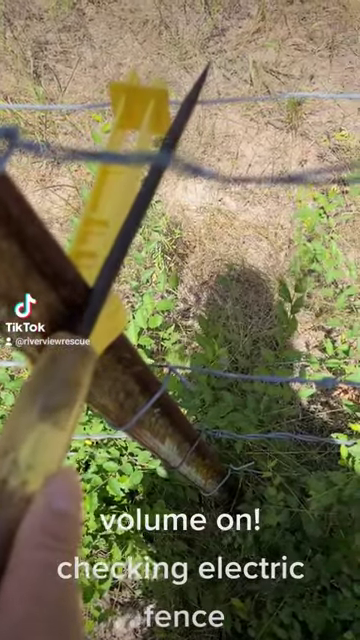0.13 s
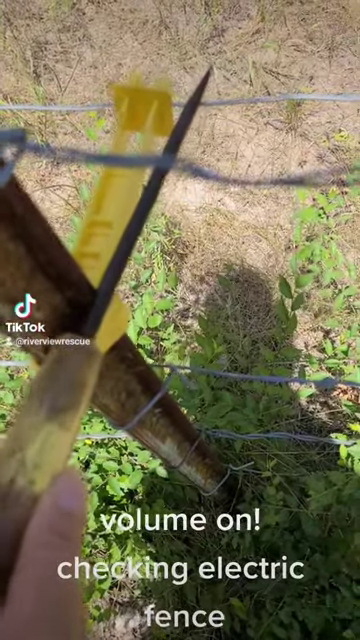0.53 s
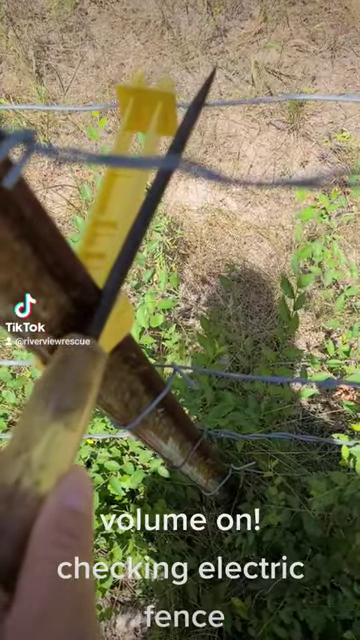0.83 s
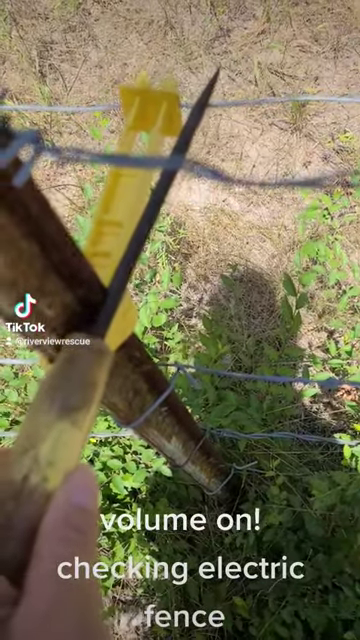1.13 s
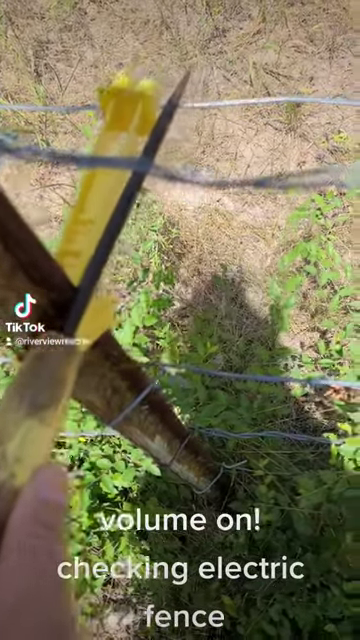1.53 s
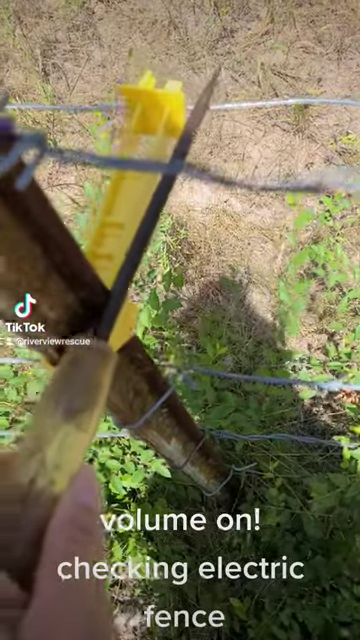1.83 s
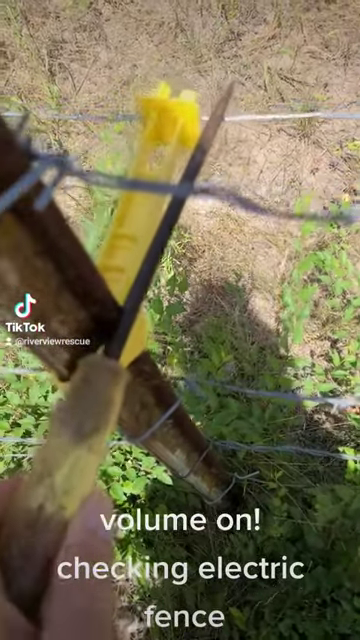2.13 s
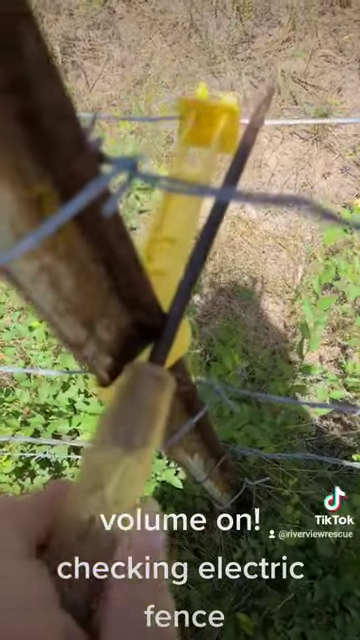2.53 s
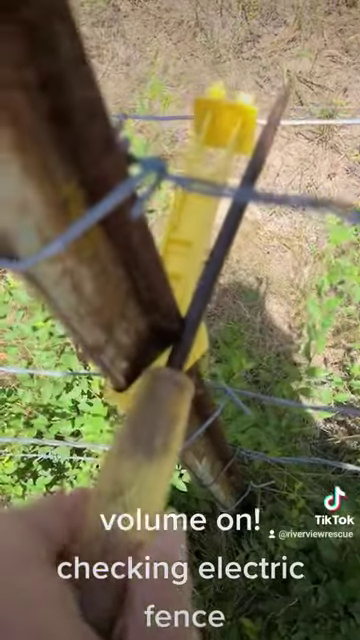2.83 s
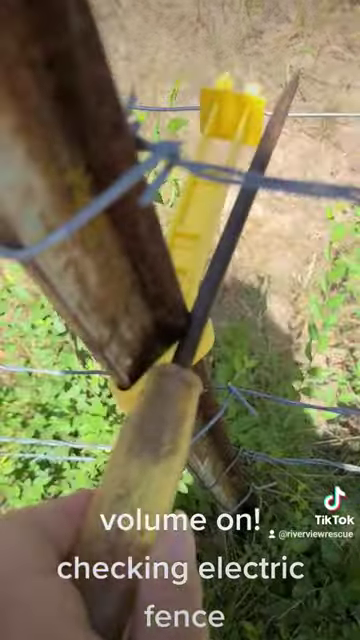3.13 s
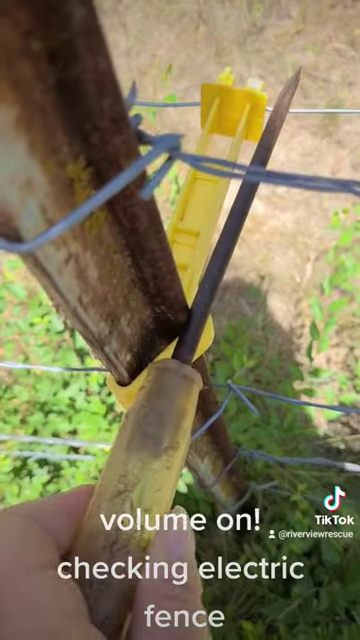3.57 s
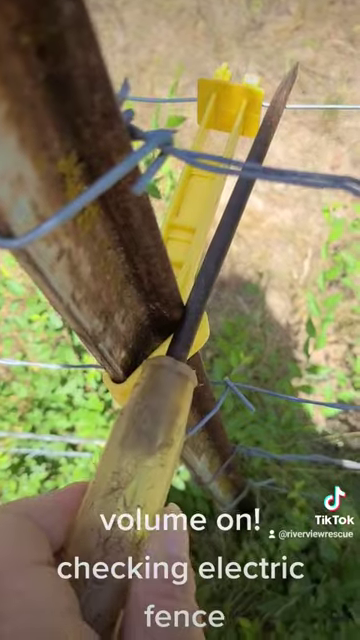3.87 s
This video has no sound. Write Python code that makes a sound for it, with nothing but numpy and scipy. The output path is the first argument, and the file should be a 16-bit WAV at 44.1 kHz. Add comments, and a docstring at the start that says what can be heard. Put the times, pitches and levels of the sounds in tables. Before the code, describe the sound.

Three loud, dry clicks of an arcing electric fence, with wind buffeting and a faint engine hum

```python
"""Sharp sparks about once a second over light wind thumps, an engine hum, distant traffic, hiss and a cricket.
An electric fence in a summer field sparks to a steel blade held close to a two-port microphone.
Each spark is a tiny shock pulse with an echo, port resonances and scattered, dying noise.
Wind, traffic and hisses are shaped noise; the far engine is three wavering sines;
the cricket is a pulsed high whistle over a blur of farther ones."""
import sys
import numpy as np
from scipy import signal
from scipy.fft import rfft, irfft
from scipy.io import wavfile

SR = 44100
rng = np.random.default_rng(int(sys.argv[2]) if len(sys.argv) > 2 else 0)


def waveform_to_disk(signal):
    """Save audio, clipped to [-1, 1], as 16-bit WAV at the path in sys.argv[1]."""
    frames = np.transpose(np.atleast_2d(signal))
    scaled = np.clip(frames, -1, 1) * 32767
    samples = np.round(scaled).astype(np.int16)
    wavfile.write(sys.argv[1], SR, samples)


N = 176400

# Wind on the ports. Each row: time in seconds, left level in dB, right level in dB.
WIND_LEVELS = [(0.0, -38.5, -33), (0.06, -38, -29.5), (0.16, -39.5, -61), (0.34, -48.5, -40.5),
               (0.46, -52.5, -45.5), (0.82, -54, -45.5), (0.91, -57.5, -46.5), (1.1, -36, -46),
               (1.42, -56.5, -50.5), (1.51, -33, -32.5), (1.55, -40.5, -23.5), (1.62, -44.5, -45),
               (1.7, -38.5, -42), (1.83, -36, -32.5), (1.87, -46, -30.5), (1.94, -52, -51),
               (2.06, -32, -51), (2.14, -45.5, -39.5), (2.21, -44, -29), (2.26, -41, -32.5),
               (2.32, -43.5, -50.5), (2.49, -44, -42), (2.58, -25.5, -36.5), (2.67, -47.5, -42),
               (2.77, -37, -32), (2.84, -50, -61), (2.9, -40.5, -43), (2.96, -32.5, -39), (3.1, -28, -52.5),
               (3.3, -42, -45.5), (3.38, -22.5, -31.5), (3.41, -23.5, -26), (3.47, -35.5, -33),
               (3.52, -27.5, -24.5), (3.69, -26, -44.5), (3.78, -42.5, -44), (3.84, -30.5, -44.5),
               (3.88, -27.5, -52), (3.92, -21.5, -23.5), (3.99, -31, -23.5)]
# Wind spectrum. Each row: frequency in Hz, relative density in dB per Hz.
WIND_SPECTRUM = [(20, -17), (35, -4.5), (60, 1.5), (90, -3), (130, -16), (200, -26), (320, -45.5)]
# Far engine tones. Each row: frequency in Hz, relative level in dB.
HUM_TONES = [(77.5, 0), (120, -19.5), (155, -25)]
# Engine loudness. Each row: time in seconds, level in dB.
HUM_LEVELS = [(0.0, -49), (0.98, -47.5), (1.22, -42.5), (2.09, -39), (2.42, -41.5), (3.75, -41),
              (4.0, -39.5)]
# Distant traffic swell. Each row: time in seconds, level in dB before TRAFFIC_LIFT_DB.
TRAFFIC_LEVELS = [(0.0, -66.5), (0.54, -62.5), (0.93, -65.5), (1.36, -65.5), (1.57, -63), (1.69, -60),
                  (2.45, -65.5), (2.84, -62.5), (3.6, -65.5), (3.87, -61.5), (4.0, -62.5)]
# Traffic spectrum. Each row: frequency in Hz, relative density in dB per Hz.
TRAFFIC_SPECTRUM = [(140, 1), (250, -0.5), (450, 2), (700, -4), (1000, -13), (1400, -13.5)]
# Field hiss spectrum. Each row: frequency in Hz, relative density in dB per Hz.
FIELD_SPECTRUM = [(470, -25), (800, -0.5), (902, -5.5), (1340, -3.5), (1590, -5.5), (2240, -7.5),
                  (2740, -5), (3580, -6), (4800, -14), (6510, -29), (7200, -46.5), (9360, -67.5),
                  (15800, -120)]
# Thin high hiss spectrum. Each row: frequency in Hz, relative density in dB per Hz.
AIR_SPECTRUM = [(9000, -21.5), (10000, -8.5), (11500, -1), (13000, -1), (15000, -2.5)]
# Near cricket loudness. Each row: time in seconds, level in dB.
CRICKET_LEVELS = [(0.0, -92), (0.3, -90), (0.6, -93.5), (1.07, -91.5), (1.83, -92.5), (2.08, -87),
                  (2.25, -83.5), (2.75, -94.5), (3.4, -91), (3.68, -94.5), (3.81, -99.5), (4.0, -100)]
# Sparks. Each row: time in seconds, left pulse in dB, left echo as a signed share of the pulse,
# left ring in dB, right pulse in dB, right echo share, right ring in dB, scatter in dB.
SPARK_EVENTS = [(0.8138, -11, -1, -15.5, -6.5, -.9, -11, -9.5),
                (1.8977, -0.5, -3.2, -25, -6.5, -.8, -13.5, -14.5),
                (2.9811, -7, 4.1, -10, -4.5, -0.093, -4, -8.5)]
# Resonances of ports and housing. Each row: frequency in Hz, left dB and right dB re the ring level,
# 60 dB decay time in seconds.
PORT_MODES = [(3300, -12, 0, .011), (4700, -8, -18, .005), (7300, -5, -9, .005), (9800, -10, -7, .005),
              (12500, -4, -3, .009)]
# Scatter from post, ground and plants, far hedge. Each row: start in ms, level in dB re the scatter level,
# 60 dB decay time in seconds, low edge in Hz, high edge in Hz.
SCATTER_PATHS = [(.4, 0, .006, 2500, 15500), (2.0, -17, .03, 2800, 15000), (6.0, -43, .14, 2000, 6500),
                 (6.0, -44, .17, 10000, 15000)]

HUM_WAVER_HZ, HUM_PAN_DB, HUM_LEFT_LEAD_RAD = 0.84, 0.5, 0.3  # waver: spread at the lowest tone
TRAFFIC_LIFT_DB = 2.5
FIELD_DB, FIELD_PAN_DB = -63, 4
AIR_DB, AIR_TOP_HZ = -83, 15300
CRICKET_HZ, CRICKET_WIDTH_HZ, STROKES_PER_S, STROKE_SHARPNESS = 8620, 250, 57, 1.3
CRICKET_PAN_DB, FAR_CRICKETS_DB = 1.5, -94
SHOCK_MS, ECHO_WIDTH_MS = .045, .03  # half-widths at 1/e
ECHO_MS, RIGHT_LAG_MS = .19, .14  # echo off the blade, path to the far port
FAR_PORT_SPREAD = 2.1  # the pulse widens as it bends round the housing
RECOVERY_HZ = 156  # the pressure step drains away below this
LEAD_SAMPLES = 8  # room for the rise of the pulse
RUMBLE_HZ, CUTOFF_HZ = 30, 16900


def from_db(db):
    """Decibels to gain."""
    return 10 ** (np.asarray(db) / 20)


def rms_one(x):
    """Scale to rms 1."""
    return x / np.sqrt(np.mean(x ** 2) + 1e-20)


def in_time(rows):
    """Table columns as curves over time."""
    s, *columns = np.transpose(rows)
    return [np.interp(np.arange(N) / SR, s, column) for column in columns]


def sides(pan_db):
    """Left and right gains for a left-over-right difference."""
    return from_db(np.array([[.5], [-.5]]) * pan_db)


def band(x, low_hz, high_hz):
    """Butterworth band-pass, second order at each edge."""
    sos = signal.butter(2, [low_hz, min(high_hz, .45 * SR)], "band", fs=SR, output="sos")
    return signal.sosfilt(sos, x)


def drift(rate_hz):
    """Slow chance, spread 1: noise through two equal poles, made at SR / 40."""
    pole = np.exp(-80 * np.pi * rate_hz / SR)
    white = rng.standard_normal(N // 40 + 2002)
    slow = signal.lfilter([1], [1, -2 * pole, pole * pole], white)[2000:]  # drop the settling
    return np.interp(np.arange(N) / 40, np.arange(len(slow)), rms_one(slow))


def noise(spectrum, alike, patchy_db, rate_hz):
    """Stereo noise of a given spectrum, in half-octave patches that flicker on their own; rms 1."""
    hz = np.fft.rfftfreq(N, 1 / SR) + 1
    points = np.array(spectrum)
    density_db = np.interp(np.log(hz), np.log(points[:, 0]), points[:, 1], left=-90, right=-90)
    mid, side = rfft(rng.standard_normal((2, N))) * from_db(density_db)
    alike = np.clip(alike, 0, 1)  # left-right correlation before flicker
    both = np.sqrt(1 + alike) * mid + np.sqrt(1 - alike) * side * [[1], [-1]]
    place = 2 * np.log2(hz / points[0, 0])
    patches = int(place[hz < 1.1 * spectrum[-1][0]].max()) + 2
    out = 0
    for k in range(patches):
        flicker = from_db(patchy_db * np.array([drift(rate_hz), drift(rate_hz)]))
        patch = both * np.clip(1 - abs(place - k), 0, 1)
        out = out + flicker * irfft(patch, N)
    return rms_one(out)


def wind():
    """Air buffeting the ports: lumpy low noise, partly shared, with its own level at each port."""
    return from_db(in_time(WIND_LEVELS)) * noise(WIND_SPECTRUM, alike=0.3, patchy_db=1, rate_hz=13)


def hum():
    """Far engine: low tones, each wavering in pitch, under a slow common level."""
    t = np.arange(N) / SR
    lowest_hz = HUM_TONES[0][0]
    out = 0
    for hz, db in HUM_TONES:
        waver_hz = HUM_WAVER_HZ * hz / lowest_hz * drift(1.6)
        phase = 2 * np.pi * (hz * t + np.cumsum(waver_hz) / SR + rng.random())
        out = out + np.sqrt(2) * from_db(db) * np.sin(phase + [[HUM_LEFT_LEAD_RAD], [0]])
    return out * sides(HUM_PAN_DB) * from_db(in_time(HUM_LEVELS)[0])


def traffic():
    """Distant traffic: swelling low noise, much alike on both sides."""
    level_db = in_time(TRAFFIC_LEVELS)[0] + TRAFFIC_LIFT_DB
    return from_db(level_db) * noise(TRAFFIC_SPECTRUM, alike=.75, patchy_db=2.3, rate_hz=18.0)


def field_hiss():
    """Wide mid-band hiss of the field, nearly unrelated left and right."""
    hiss = noise(FIELD_SPECTRUM, alike=.027, patchy_db=.8, rate_hz=24.0)
    return from_db(FIELD_DB) * sides(FIELD_PAN_DB) * hiss


def high_hiss():
    """Thin high hiss, its last density held up to AIR_TOP_HZ."""
    spectrum = AIR_SPECTRUM + [(AIR_TOP_HZ, AIR_SPECTRUM[-1][1])]
    return from_db(AIR_DB) * noise(spectrum, alike=.05, patchy_db=1.5, rate_hz=15.0)


def cricket():
    """Wing strokes at a near-steady rate, each a short narrow whistle, over a blur of farther crickets."""
    level_db, = in_time(CRICKET_LEVELS)
    stroke_rate = STROKES_PER_S * (1 + .008 * drift(4.0))
    strokes = np.sin(np.pi * np.cumsum(stroke_rate) / SR) ** 2
    tone = np.sin(2 * np.pi * CRICKET_HZ * np.arange(N) / SR + [[0], [1.5]])
    blur = rng.standard_normal((2, N))
    for width_hz in (2 * CRICKET_WIDTH_HZ, CRICKET_WIDTH_HZ):
        blur = band(blur, CRICKET_HZ - width_hz, CRICKET_HZ + width_hz)
    blur = rms_one(blur)
    near = rms_one(strokes ** STROKE_SHARPNESS * from_db(2.0 * drift(20.0)) * (tone + .5 * blur))
    far = from_db(FAR_CRICKETS_DB + 2.0 * drift(5.0)) * blur
    return (from_db(level_db) * near + far) * sides(CRICKET_PAN_DB)


def shock(ms, db, echo_share, side):
    """Brief Gaussian pressure pulse, wider at the far port, and its signed echo off the blade."""
    pulse = np.exp(-(ms / (SHOCK_MS * FAR_PORT_SPREAD ** side)) ** 2)
    echo = np.exp(-((ms - ECHO_MS) / ECHO_WIDTH_MS) ** 2)
    return from_db(db) * (pulse + echo_share * echo)


def port_ring(age_s, ring_db, side):
    """Ports and housing ring as decaying sines."""
    out = 0
    for hz, *mode_db, t60_s in PORT_MODES:
        level_db = ring_db + mode_db[side] - 60 * age_s / t60_s
        out = out + from_db(level_db) * np.sin(2 * np.pi * hz * age_s)
    return out


def scattered(age_s, scatter_db):
    """Many small reflections blend into bands of dying hiss, later ones starting later."""
    out = 0
    for start_ms, path_db, t60_s, low_hz, high_hz in SCATTER_PATHS:
        path_age_s = age_s - start_ms / 1000
        hiss = rms_one(band(rng.standard_normal(len(age_s)), low_hz, high_hz))
        level_db = scatter_db + path_db - 60 * path_age_s / t60_s
        out = out + (path_age_s > 0) * from_db(level_db) * hiss
    return out


def sparks():
    """Each shock reaches both ports, rings and scatters; a first-order high-pass drains the pressure."""
    out = np.zeros((2, N + SR))
    t = np.arange(SR // 4) / SR
    for s, *ports, scatter_db in SPARK_EVENTS:
        start = int(s * SR) - LEAD_SAMPLES
        for side, (db, echo_share, ring_db) in enumerate([ports[:3], ports[3:]]):
            ms = (t - LEAD_SAMPLES / SR) * 1000 - side * RIGHT_LAG_MS
            age_s = np.maximum(ms, 0) / 1000
            sound = shock(ms, db, echo_share, side) + port_ring(age_s, ring_db, side)
            out[side, start:start + len(t)] += sound + scattered(age_s, scatter_db)
    drain = signal.butter(1, RECOVERY_HZ, "high", fs=SR, output="sos")
    return signal.sosfilt(drain, out[:, :N])


def scene():
    """Sum of wind, hum, traffic, hisses, cricket and sparks."""
    return wind() + hum() + traffic() + field_hiss() + high_hiss() + cricket() + sparks()


def record(dry):
    """Rumble is cut, peaks are rounded just under full scale, the top is cut."""
    dry = signal.sosfilt(signal.butter(2, RUMBLE_HZ, "high", fs=SR, output="sos"), dry)
    rounded = dry / (1 + np.abs(dry / .95) ** 6) ** (1 / 6)
    return signal.sosfilt(signal.cheby2(16, 80, CUTOFF_HZ, fs=SR, output="sos"), rounded)


dry = scene()
out = record(dry)
waveform_to_disk(out)
```